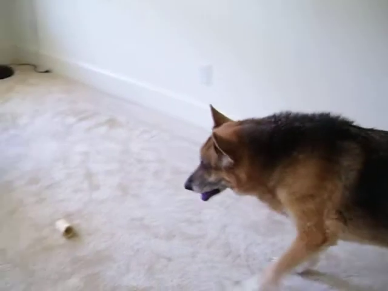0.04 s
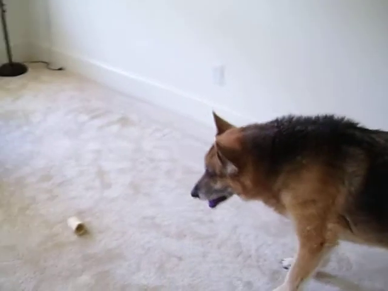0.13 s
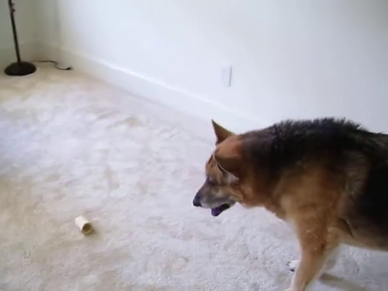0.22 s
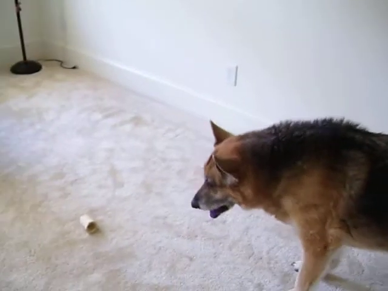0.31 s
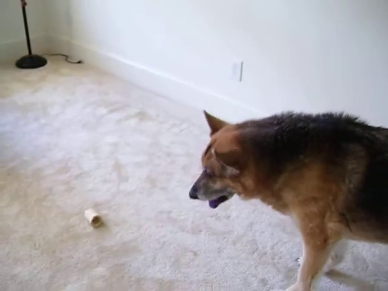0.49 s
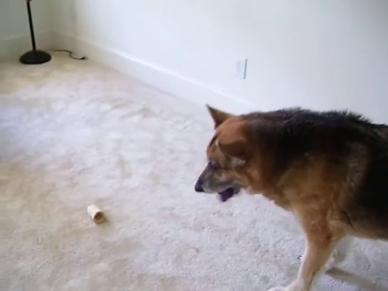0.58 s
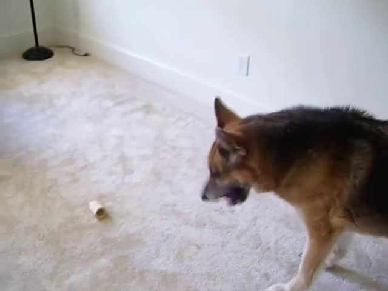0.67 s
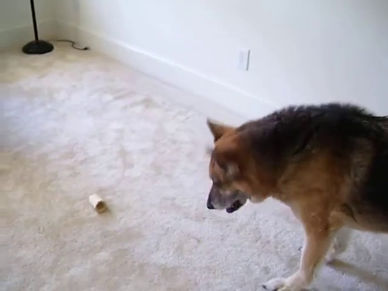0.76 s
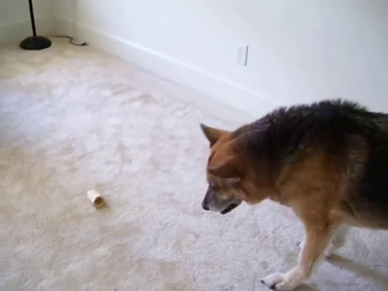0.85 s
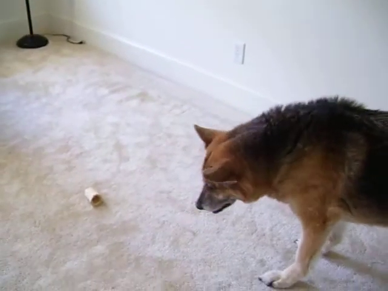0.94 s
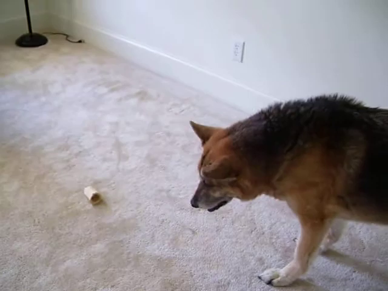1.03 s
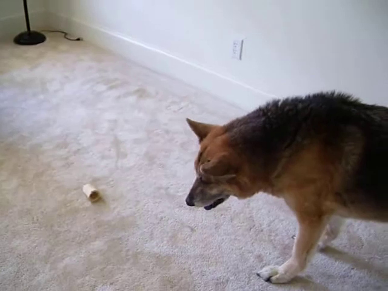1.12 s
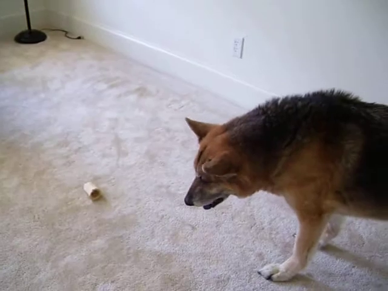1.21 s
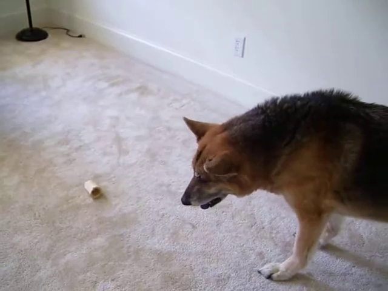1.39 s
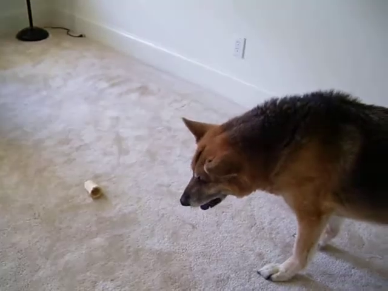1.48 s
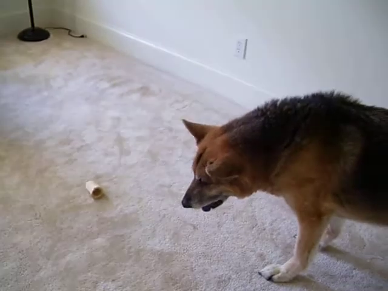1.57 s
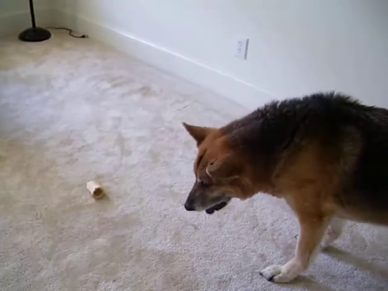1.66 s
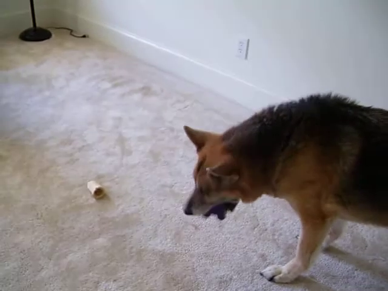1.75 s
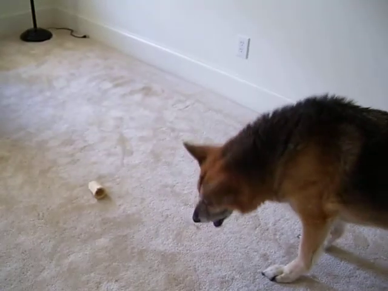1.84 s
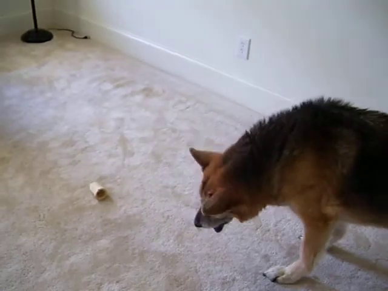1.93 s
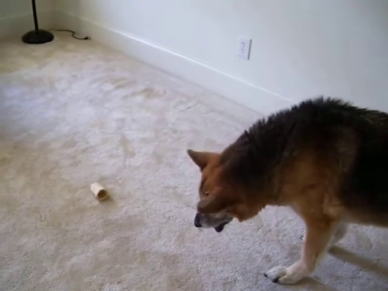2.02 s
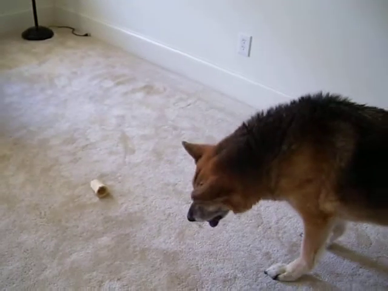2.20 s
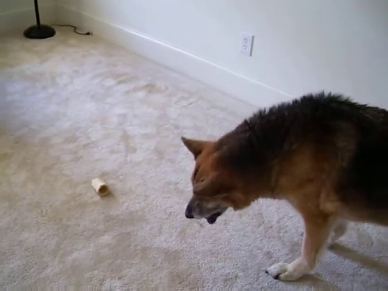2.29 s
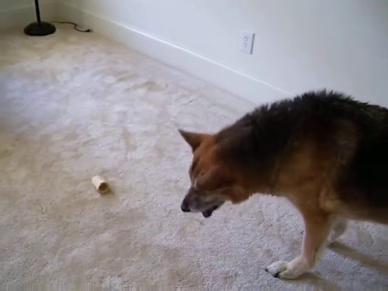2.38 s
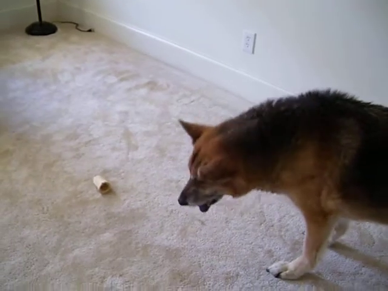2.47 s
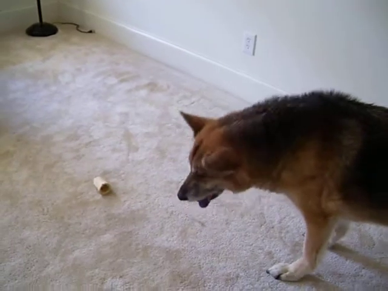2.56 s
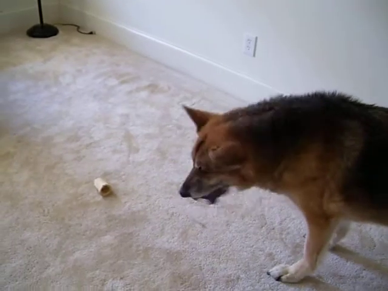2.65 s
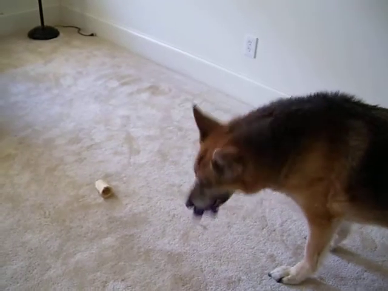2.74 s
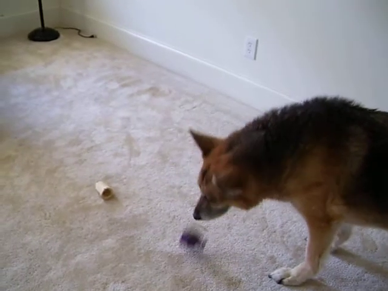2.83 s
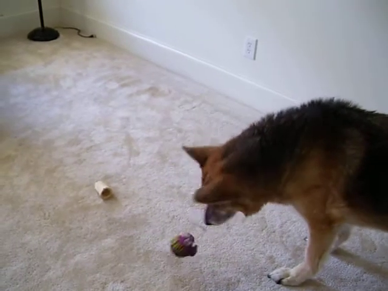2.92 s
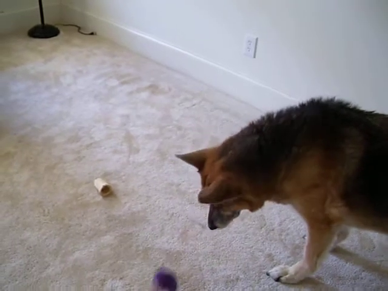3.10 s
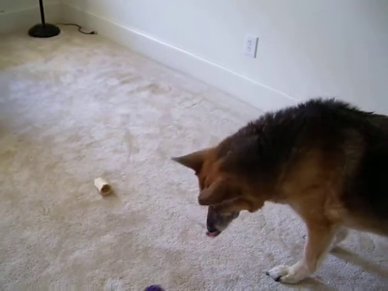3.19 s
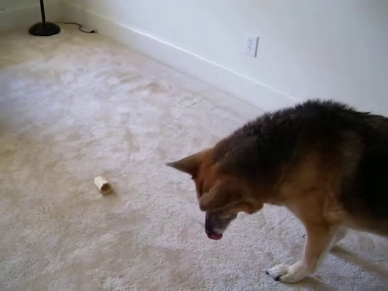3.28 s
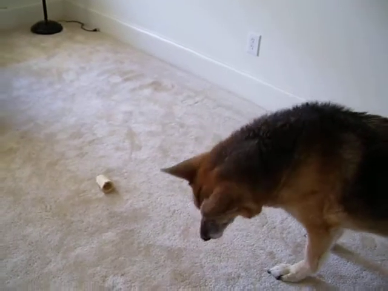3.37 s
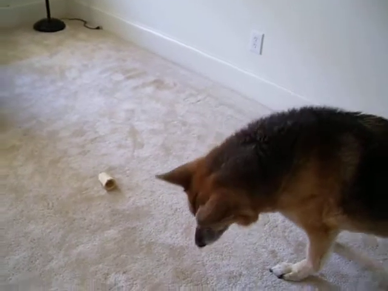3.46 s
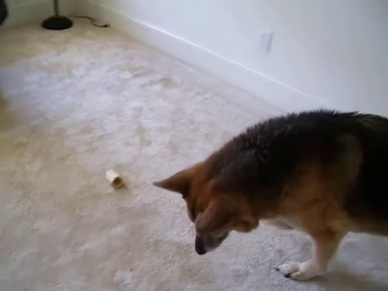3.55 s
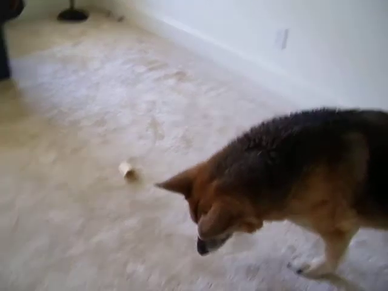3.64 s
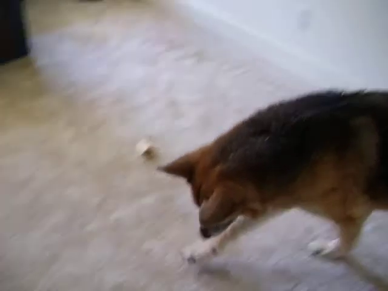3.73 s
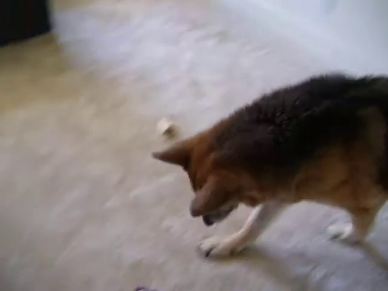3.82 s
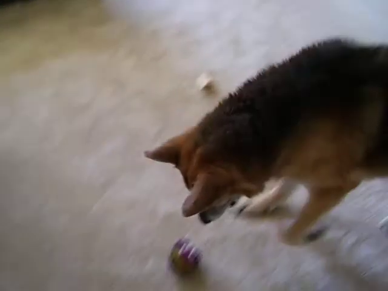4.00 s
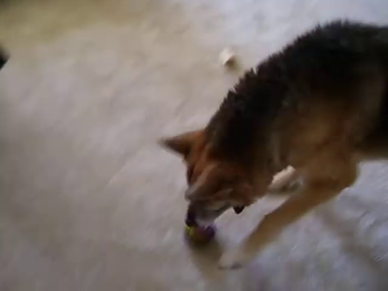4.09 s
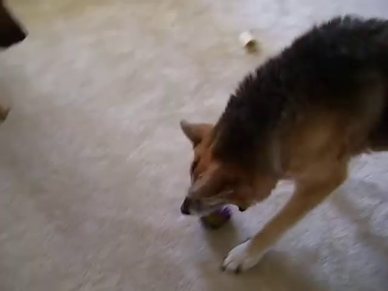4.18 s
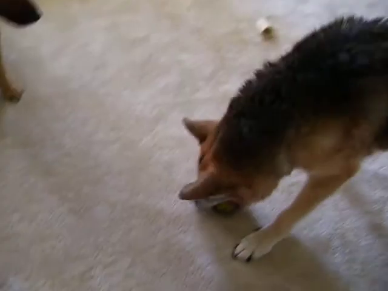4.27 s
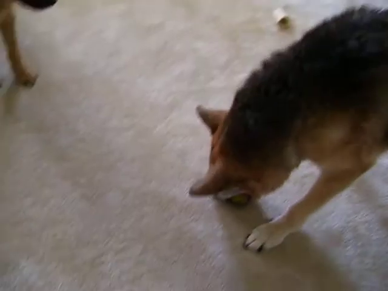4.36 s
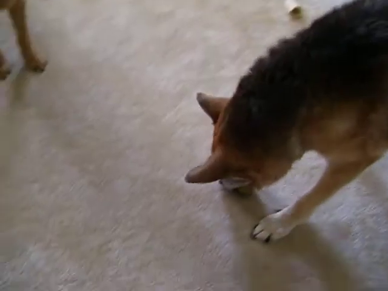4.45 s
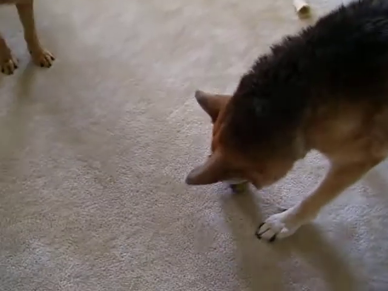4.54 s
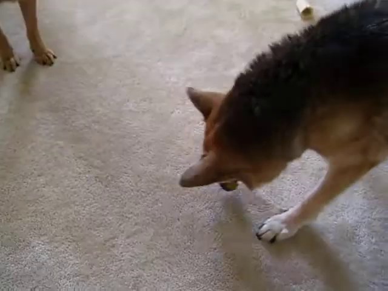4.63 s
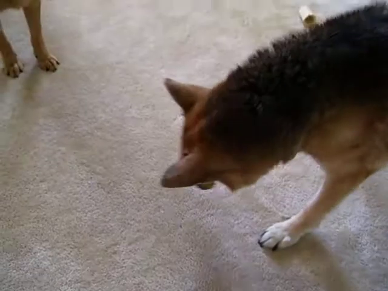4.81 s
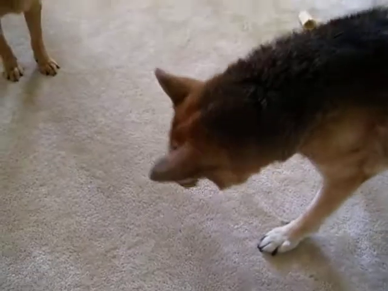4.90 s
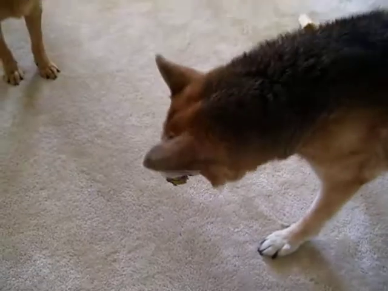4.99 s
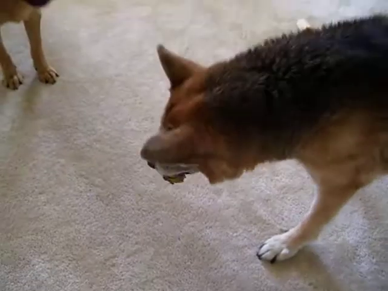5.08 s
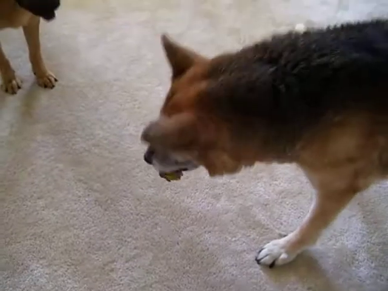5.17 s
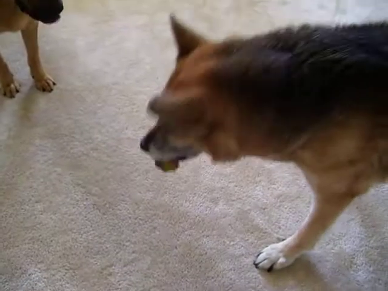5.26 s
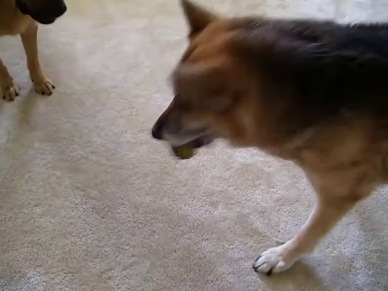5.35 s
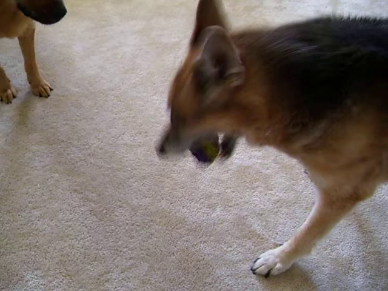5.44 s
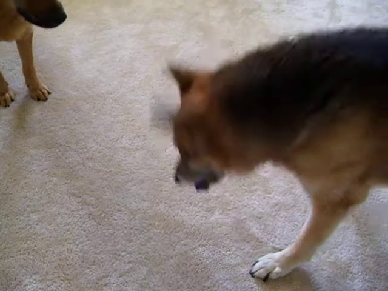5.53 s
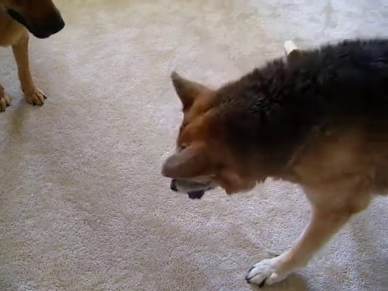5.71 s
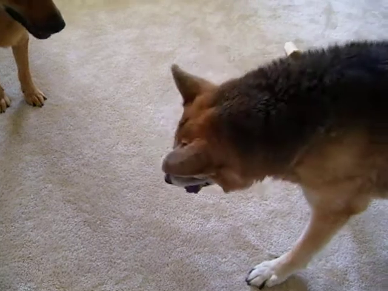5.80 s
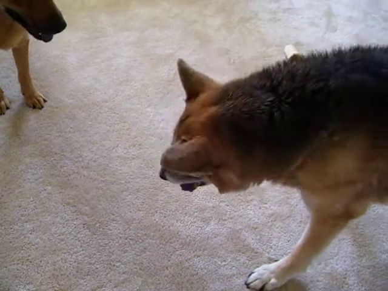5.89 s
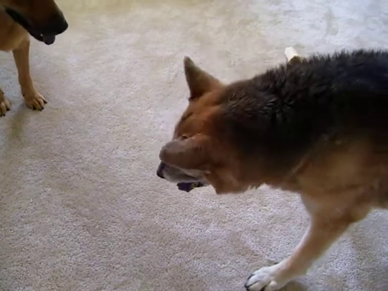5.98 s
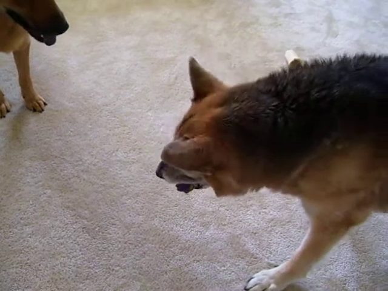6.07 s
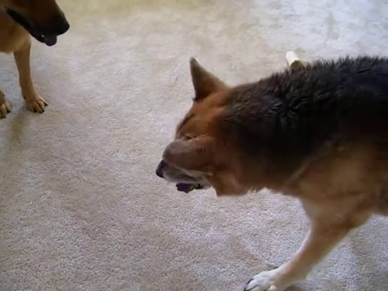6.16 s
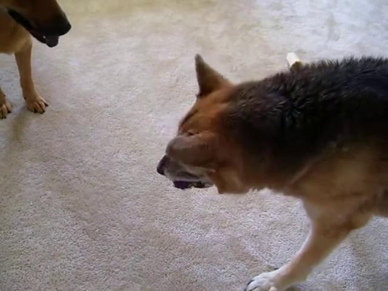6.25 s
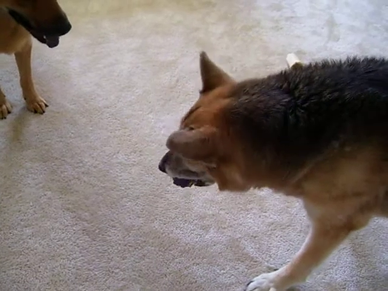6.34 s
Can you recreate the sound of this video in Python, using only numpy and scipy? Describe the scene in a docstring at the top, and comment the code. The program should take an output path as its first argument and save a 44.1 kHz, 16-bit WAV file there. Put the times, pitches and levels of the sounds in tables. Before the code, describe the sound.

In a small carpeted room, a dog bites a squeaky rubber ball. A raspy low note leaps into a loud rising squeak and falls back, then weaker honks follow. The ball slips out with a fluttering thump, jaws snap and paws scuff, then very high squeals glide down and a low whine trails to the end. Narrow, dull camera sound with steady hiss.

```python
"""A dog chews a rubber squeaky ball in a carpeted room. Each bite drives air through the ball's reed, a harmonic
stack that glides with the pressure; under a weak flow it drops to a lower note. Teeth and jaws click as damped
rings, slipping rubber rumbles in the hollow ball, and paws and muzzle brush the carpet as noise.
A steady noise floor lies under it; a small narrow-band camera picks it up and clips loud peaks."""
import sys
import numpy as np
from scipy import signal
from scipy.fft import rfft, irfft, next_fast_len
from scipy.io import wavfile
from scipy.ndimage import map_coordinates

SR = 44100
rng = np.random.default_rng(int(sys.argv[2]) if len(sys.argv) > 2 else 0)


def transcribe(signal):
    """Save signal, clipped to [-1, 1], as a 16-bit WAV file at the path in sys.argv[1]."""
    frames = np.atleast_2d(signal).T
    limited = np.clip(frames, -1, 1)
    pcm = np.round(limited * 32767).astype(np.int16)
    wavfile.write(sys.argv[1], SR, pcm)


N = 283254

# Rubber creases and shudders between the teeth: centre_s, half_length_s, level_db
SHUDDER_EVENTS = [(0.833, 0.039, -35), (1.41, .02, -40.5), (1.945, 0.022, -36.5), (2.907, .022, -31),
                  (3.046, 0.0081, -48.5), (3.068, 0.041, -41.5), (5.535, 0.0086, -30.5),
                  (5.613, 0.023, -34), (5.665, 0.019, -35)]

SQUEAK_SCOOP, LOW_SCOOP, SCOOP_S = -.06, .11, .005  # starting pitch error (share), settling time
SQUEAK_ATTACK_S, LOW_ATTACK_S, CUT_S = .004, .008, .004  # a weak flow is slower to start the reed
DROOP_SHARE, DROOP_DB = .15, 12  # pitch and level lost at the note's end as pressure dies
BREAK_HZ, BREAK_WIDTH_HZ, BREAK_RATTLE = 1400, 200, .2  # the reed rattles on its way into the top register
SHUDDER_RATTLE = .28  # rattle depth while the rubber shudders
TILT_HZ = 3100  # overtones tilt below this
SLIP_S, SLIP_KNOTS_PER_S = .0022, 150  # rubber gives in jerks: glides run early or late
JITTER, ROUGH_JITTER, RATTLE_JITTER = .0028, .043, .035  # pitch shake (share): clean, per roughness, per rattle


def amp(db):
    """Decibels to gain."""
    return 10 ** (np.asarray(db) / 20)


def unit(x):
    """Scale to rms 1."""
    return x / np.sqrt(np.mean(x ** 2) + 1e-20)


def along(points, hz):
    """Interpolate (Hz, value) points on a log frequency axis."""
    point_hz, values = np.transpose(points)
    return np.interp(np.log(hz + 1), np.log(point_hz + 1), values)


def wobble(knots_per_s, size):
    """Smooth random curve through normal-distributed knots."""
    knots = rng.standard_normal(int(size * knots_per_s / SR) + 4)
    return map_coordinates(knots, [np.arange(size) * knots_per_s / SR])


def filtered(x, response):
    """Apply a frequency response to x by FFT."""
    m = next_fast_len(N + SR // 2)
    return irfft(rfft(x, m) * response(np.fft.rfftfreq(m, 1 / SR)), m)[:N]


def noise(spectrum):
    """Coloured noise of rms 1."""
    return unit(filtered(rng.standard_normal(N), lambda hz: amp(along(spectrum, hz))))


def swell(t, centre, half):
    """Bell-shaped rise and fall."""
    return np.exp(-((t - centre) / half) ** 2)


def add(out, start_s, x):
    """Mix x into out in place from start_s."""
    part = out[round(start_s * SR):][:len(x)]
    part += x[:len(part)]


def room_tone():
    """Room tone and hiss: coloured noise with a slowly drifting level."""
    # hz, relative_level_db_per_hz
    floor_spectrum = [(15, -52), (25, -25), (48, -8.5), (136, -7), (167, -2), (220, -4), (329, -1.5),
                      (482, -1.5), (513, -4.5), (735, -2), (1150, -9.5), (2960, -12.5), (3900, -16.5),
                      (5070, -48), (8580, -120)]
    # time_s, level_db
    floor_level = [(0, -49.5), (2.6, -50.5), (3.6, -51), (4.4, -48.5), (6.4, -50)]
    level_db = np.interp(np.arange(N) / SR, *np.transpose(floor_level))
    return noise(floor_spectrum) * amp(level_db)


def clicks(attack_s=.00025, crack=.13, crack_t60_s=.073, ring_cycles=12):
    """Teeth and jaws: each snap rings the mouth, with a wet noise crack around the same pitch."""
    # start_s, peak_db (before a common +1 dB), ring_hz
    snap_events = [(0.3, -43.5, 420), (0.611, -41, 399), (1.387, -21, 671), (1.792, -34, 2228),
                   (2.499, -35, 765), (3.8395, -20.5, 1117), (3.88, -32, 1060), (4.078, -36, 1400),
                   (4.093, -32.5, 1310), (4.1822, -24.5, 1950), (4.187, -26.5, 1507), (4.424, -32.5, 388),
                   (4.4307, -23, 1100), (5.402, -34.5, 599), (5.427, -36, 900)]
    out, t = np.zeros(N), np.arange(SR // 8) / SR
    for start_s, peak_db, hz in snap_events:
        ring = np.sin(2 * np.pi * hz * t) * amp(-60 * t * hz / ring_cycles)  # -60 dB in ring_cycles
        band = signal.butter(3, [hz / 2, hz * np.sqrt(2)], "bandpass", fs=SR, output="sos")
        wet = unit(signal.sosfilt(band, rng.standard_normal(len(t)))) * amp(-60 * t / crack_t60_s)
        snap = (ring + crack * wet) * (1 - swell(t, 0, attack_s))
        add(out, start_s, amp(peak_db + 1) * snap / np.abs(snap).max())
    return out


def flow(t, note, scoop):
    """Pitch and level of one note: glide with air pressure, shift in a clench, droop at release."""
    # The jaws clench or slacken briefly: centre_s, half_length_s, pitch_change_share, gain_db
    clenches = [(.995, .026, .02, 3), (1.14, 0.011, 0, -3), (2.037, 0.011, -.005, -4.5),
                (2.087, .048, .083, 3.2), (2.13, 0.0066, -0.0012, -6.5), (4.596, .014, -0.0084, 4.5),
                (4.833, .013, 0.054, 5.5), (4.951, .04, .035, 0), (5.037, 0.022, -.025, -2.5),
                (5.109, .045, .045, 0.5), (5.7, 0.013, .01, -4), (5.726, 0.0036, 0.075, 6),
                (5.921, 0.0074, .03, 5), (6.097, .022, 0.0092, 3), (6.225, 0.027, 0.0022, -7),
                (6.323, 0.045, .02, 2)]
    start_s, length_s, from_hz, to_hz, glide_s, bend, from_db, to_db, _, _, release_s, _ = note
    age = np.abs(t - start_s)
    progress = 1 - np.exp(-(age / glide_s) ** bend)
    dying = np.exp((age - length_s) / release_s)
    pitch = from_hz * (to_hz / from_hz) ** progress
    pitch = pitch * (1 + scoop * np.exp(-age / SCOOP_S)) * (1 - DROOP_SHARE * dying)
    level_db = from_db + (to_db - from_db) * progress - DROOP_DB * dying
    for centre_s, half_s, change, gain_db in clenches:
        bump = swell(t, centre_s, half_s)
        pitch = pitch * (1 + change * bump)
        level_db = level_db + gain_db * bump
    return pitch, level_db


def reed(note, scoop, attack_s, waver=.004, wander_db=3.0, wander_knots_per_s=45):
    """One reed note: seven harmonics follow the air pressure, coloured by ball and mouth."""
    # Colour of ball and mouth: hz, gain_db
    body = [(620, -1.5), (780, 4.5), (970, -3.5), (1200, -9.5), (1500, -3), (1850, -7.5), (2150, -5.5),
            (2450, -2.5), (3000, -.5), (3400, -2.5), (3800, -6.5), (4100, -15)]
    start_s, length_s, *_, first_db, tilt_db_per_octave, _, rough = note
    size = int(length_s * SR)
    t = start_s + np.arange(size) / SR
    pitch, level_db = flow(t, note, scoop)
    pitch = np.interp(t + SLIP_S * wobble(SLIP_KNOTS_PER_S, size), t, pitch)

    shudder = sum(swell(t, centre_s, half_s) for centre_s, half_s, _ in SHUDDER_EVENTS)
    rattle = BREAK_RATTLE * swell(pitch, BREAK_HZ, BREAK_WIDTH_HZ) + SHUDDER_RATTLE * shudder
    jitter = JITTER + ROUGH_JITTER * rough + RATTLE_JITTER * rattle
    unsteady = jitter * wobble(500, size) + waver * wobble(wander_knots_per_s, size)
    phase = 2 * np.pi * np.cumsum(pitch * (1 + unsteady)) / SR

    k = np.arange(1, 8)[:, None]
    partial_hz = k * pitch
    # The moving mouth shades each partial differently.
    shade_db = wander_db * np.array([wobble(wander_knots_per_s, size) for _ in k])
    tilt_db = tilt_db_per_octave * np.log2(np.minimum(partial_hz / TILT_HZ, 1))
    colour_db = along(body, partial_hz) + np.where(k == 1, first_db, tilt_db)
    weights = amp(colour_db + shade_db) / (1 + (partial_hz / 4100) ** 40)  # steep cut near 4.1 kHz
    tone = np.sum(weights * np.sin(k * phase), axis=0) / np.linalg.norm(weights, axis=0)

    # Turbulence shakes the swing; rattle weakens every second cycle.
    turbulence = rough * wobble(900, size)
    swing = 1 + turbulence + rattle * (np.cos(phase / 2) + wobble(350, size))
    gate = np.clip(np.minimum((t - start_s) / attack_s, (t[-1] - t) / CUT_S), 0, 1)
    return np.sqrt(2) * amp(level_db) * tone * swing * gate


def ball(x, top_hz=1300, low_hz=130):
    """Hollow-ball resonances; small and soft, it radiates little deep bass or treble."""
    # centre_hz, width_hz, gain_db
    ball_modes = [(203, 52, -8), (297, 110, 3), (585, 160, 8), (750, 63, -10.5), (1170, 170, -31)]

    def response(f):
        modes = sum(amp(db) * 1j * f * w / (c * c - f * f + 1j * f * w) for c, w, db in ball_modes)
        return modes * (1j * f / (low_hz + 1j * f)) ** 2 / (1 + 1j * f / top_hz) ** 2

    return filtered(x, response)


def shudders(slips_per_s=400):
    """Uneven little slips of rubber on teeth, random impulses, rumble in the ball."""
    t = np.arange(N) / SR
    slips = (rng.random(N) < slips_per_s / SR) * rng.uniform(.15, 1, N) * rng.choice([-1, 1], N)
    envelope = sum(amp(db) * swell(t, centre_s, half_s) for centre_s, half_s, db in SHUDDER_EVENTS)
    return unit(ball(slips)) * envelope


def flaps(start_s=3.0093, gap_s=.0068, peak_db=-16.5, loss_db=1.9, count=4, size=40):
    """As the ball slips free the slack reed beats the hollow ball, each beat weaker than the last."""
    beats = np.zeros(N)
    for k in range(count):
        add(beats, start_s + k * gap_s, amp(-k * loss_db) * np.hanning(size))
    thump = ball(beats)
    return amp(peak_db) * thump / np.abs(thump).max()


def scuffs():
    """Paws and muzzle brush the carpet pile: short swells of coloured noise."""
    # centre_s, half_length_s, level_db
    rubs = [(4.049, 0.017, -41.5), (4.092, 0.014, -50.5), (4.218, 0.033, -71), (4.758, 0.14, -51.5)]
    # hz, relative_level_db_per_hz
    carpet = [(100, -17.5), (500, 12), (1500, -4.5), (2500, -2), (3800, -10)]
    t = np.arange(N) / SR
    return noise(carpet) * sum(amp(db) * swell(t, centre_s, half_s) for centre_s, half_s, db in rubs)


def room(x, tail_db=-7.0, build_s=.003):
    """A few wall echoes and a short diffuse tail whose decay varies with frequency."""
    # Early echoes: delay_s, gain_db
    walls = [(.0058, -17), (.0105, -17), (.0155, -11.5), (.021, -15.5), (.031, -11)]
    # Tail decay: hz, t60_s
    decay = [(200, 0.8), (700, 0.37), (2100, 0.42), (3000, .32), (4000, 0.37)]
    hz, t, z = signal.stft(rng.standard_normal(SR * 3 // 4), SR, nperseg=256)
    envelope = amp(-60 * t / along(decay, hz)[:, None]) * (1 - np.exp(-t / build_s))
    tail = signal.istft(z * envelope, SR, nperseg=256)[1]
    answer = amp(tail_db) * tail / np.linalg.norm(tail)
    for delay_s, db in walls:
        add(answer, delay_s, amp([db]))
    return signal.fftconvolve(x, answer)[:N]


def scene(click_room_db=-11):
    """The toy and the dog in the room, over room tone and hiss."""
    # Both note tables: start_s, length_s, from_hz, to_hz, glide_s, bend (high holds the first pitch longer),
    # from_db, to_db, fundamental_db, tilt_db_per_octave, release_s, roughness (0-1)
    # Weak flow: the low, raspy note sags as the flow runs out
    low_notes = [(0.757, .085, 633.4, 584, .064, 5, -19.5, -28.5, 0, -1.5, .007, .05),
                 (1.859, 0.059, 637, 582, 0.049, 4, -23, -23, 0, 3, .003, .07),
                 (1.913, 0.042, 610.7, 578, 0.032, 2, -28, -30, 0, -1, .004, 0.25),
                 (2.817, .05, 671.7, 589, .039, 3, -19.5, -22.5, -1.5, -0.5, .003, 0.12),
                 (2.874, 0.13, 628.4, 578, 0.093, 1.3, -21.5, -28, -1.5, 4, 0.0039, 0.08),
                 (5.513, .079, 783, 730, .056, 3, -17.5, -20, -4, -2, 0.00092, .06),
                 (5.589, .05, 696.4, 625, 0.038, 3, -23, -19.5, -2, 1, 0.0043, 0.25),
                 (6.046, .342, 622, 570.5, 0.092, 4, -24, -31, 8.5, -7, 0.0037, 0.01)]
    # Strong flow: pitch follows the jaws as they close and ease
    squeaks = [(0.898, 0.19, 964.2, 1635, 0.15, 4.4, -16, -8.5, -3.5, -5, 0.00089, .07),
               (1.089, 0.072, 2130, 2108, 0.051, 0.89, -6, -6.5, 0, -1, .001, 0.1),
               (1.149, 0.072, 1560, 925, 0.031, 2.2, -10, -14.5, -4, -6.5, .012, .18),
               (1.999, .194, 970, 958, .1, 2, -16.5, -17.5, -7.5, 16, .014, .03),
               (4.486, .148, 996.6, 4080, .107, 4.1, -20.5, -18.5, 7, -0.5, 0.0026, 0.06),
               (4.799, 0.02, 3890, 4020, 0.0073, 2, -31, -30.5, 0, 0, 0.0034, 0),
               (4.815, .374, 3178, 921.2, .068, 1.4, -18.5, -21, -2, 6.5, .012, .03),
               (5.675, 0.11, 985, 3450, .056, 3.4, -14, -16.5, 3, 6, .004, .16),
               (5.892, 0.071, 4025, 935, .021, 1.2, -14, -15.5, -5, -5, 0.013, 0.2)]
    toy = np.zeros(N)
    for note in low_notes:
        add(toy, note[0], reed(note, LOW_SCOOP, LOW_ATTACK_S))
    for note in squeaks:
        add(toy, note[0], reed(note, SQUEAK_SCOOP, SQUEAK_ATTACK_S))
    spread = toy + shudders() + flaps() + scuffs()
    snaps = clicks()  # close to the carpet, which soaks up most of their echo
    echoes = room(spread + amp(click_room_db) * snaps)
    return (spread + snaps + echoes + room_tone())[None]


def record(dry, camera_hz=8000, top_hz=15800, ceiling=.72):
    """Camera input: band limit and clipping, then a low sample rate folds distortion and mirrors the band top."""
    narrow = filtered(dry[0], lambda hz: 1 / np.sqrt(1 + (2 * hz / camera_hz) ** 60))
    narrow = np.clip(narrow, -ceiling, ceiling)
    clock = 2 * np.pi * camera_hz * np.arange(N) / SR
    folded = narrow * (1 + 2 * np.cos(clock) + 2 * np.cos(2 * clock))  # images around the sample rate
    # hz, gain_db
    skirt = [(3600, 0), (4000, -6), (4300, -20), (4550, -42), (4800, -85), (5200, -120)]
    smooth = filtered(folded, lambda hz: amp(along(skirt, hz)))
    # Peaks that overshoot between samples clip again and crackle in the treble.
    clipped = np.clip(smooth, -ceiling, ceiling)
    return filtered(clipped, lambda hz: hz < top_hz)[None]


dry = scene()
out = record(dry)
transcribe(out)
```